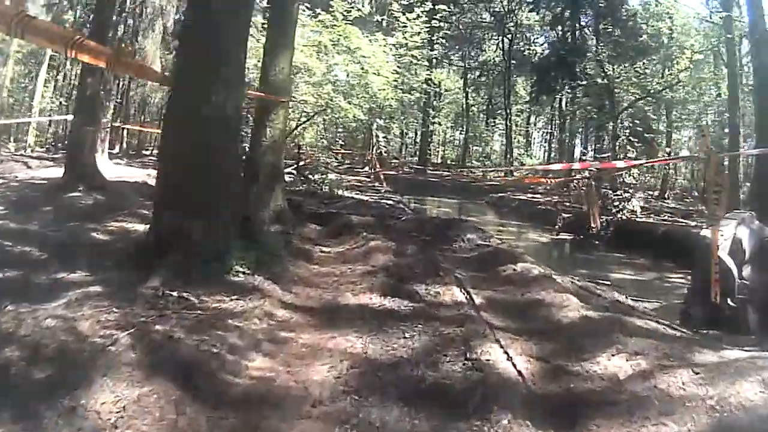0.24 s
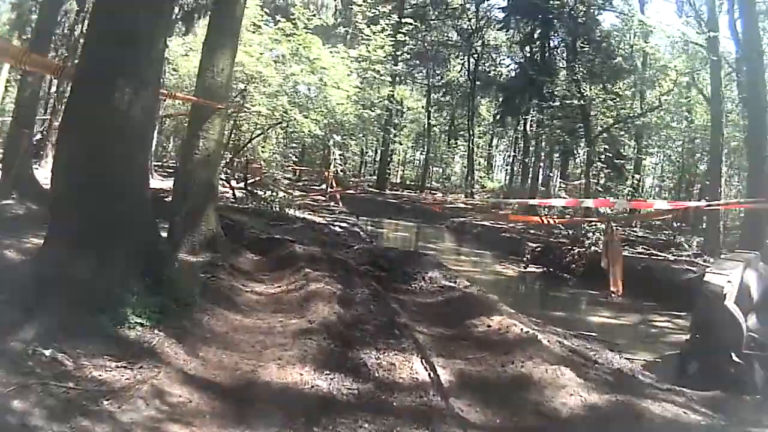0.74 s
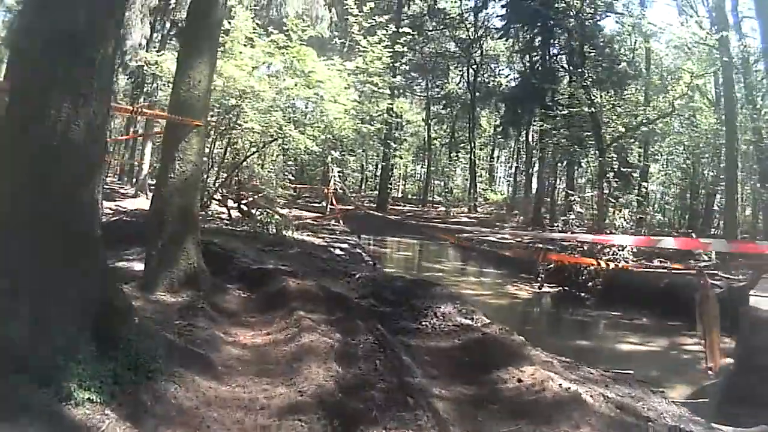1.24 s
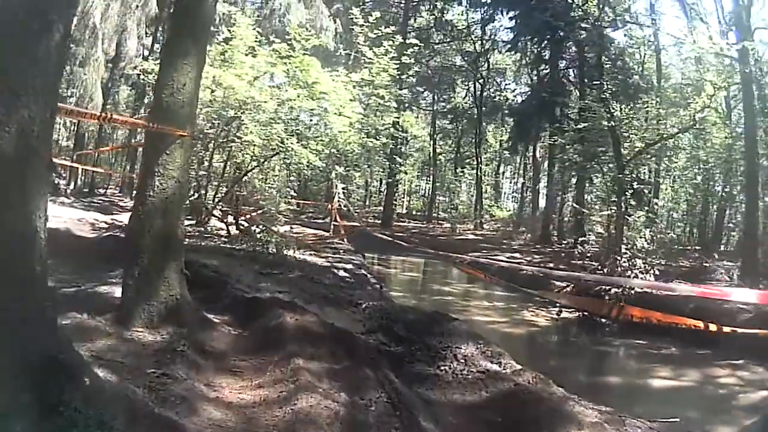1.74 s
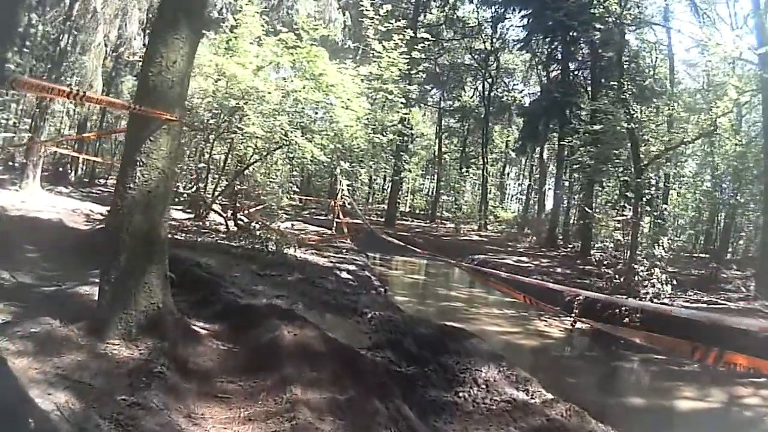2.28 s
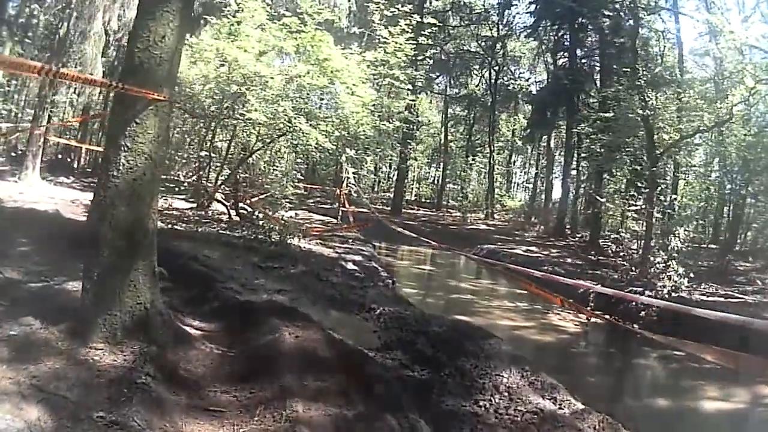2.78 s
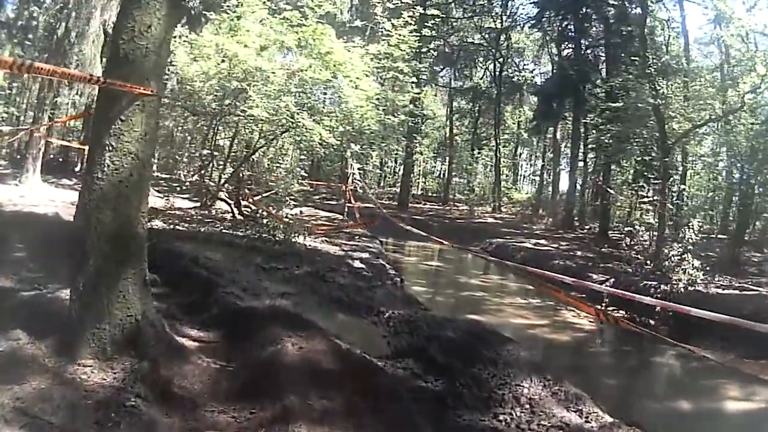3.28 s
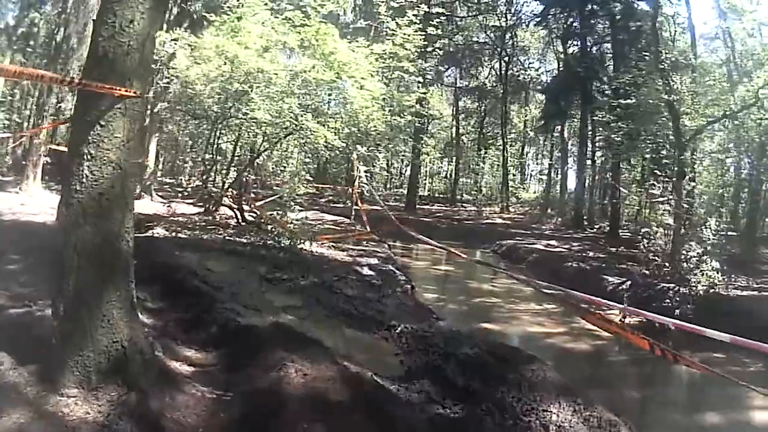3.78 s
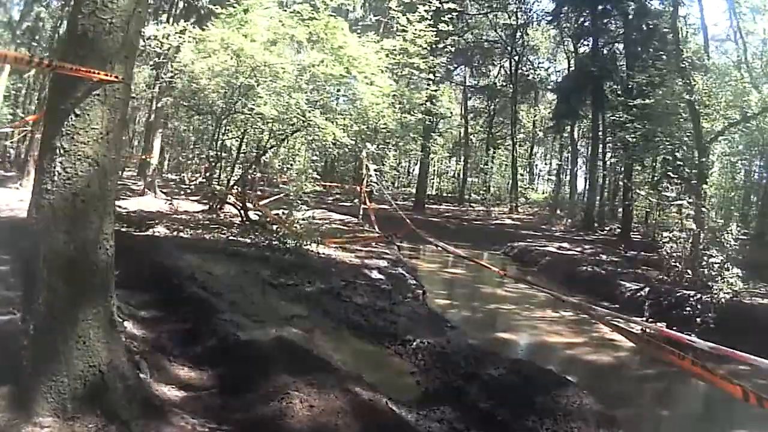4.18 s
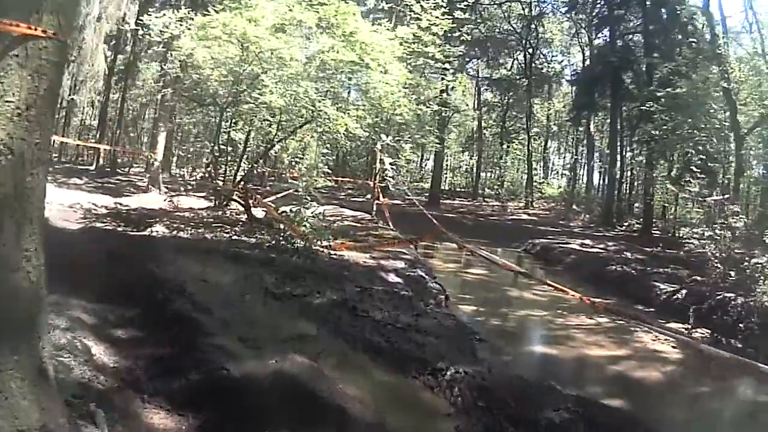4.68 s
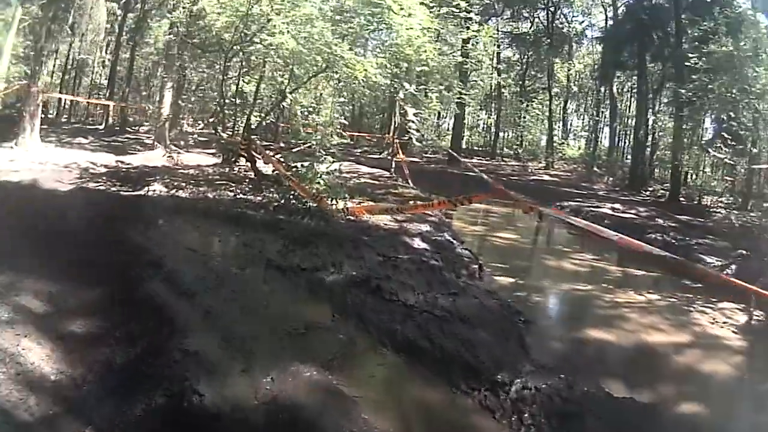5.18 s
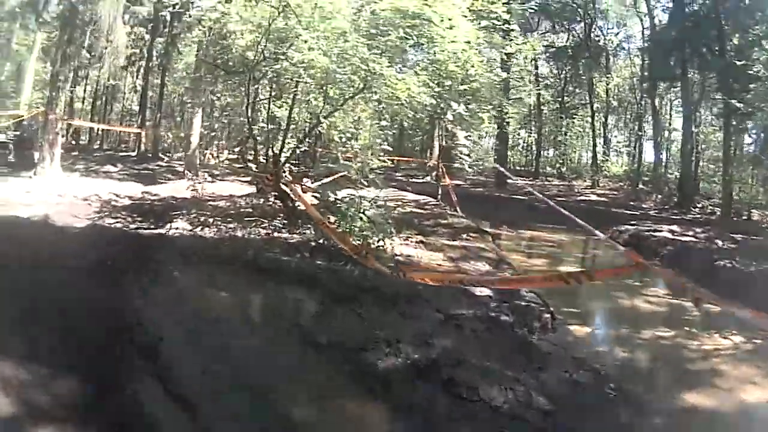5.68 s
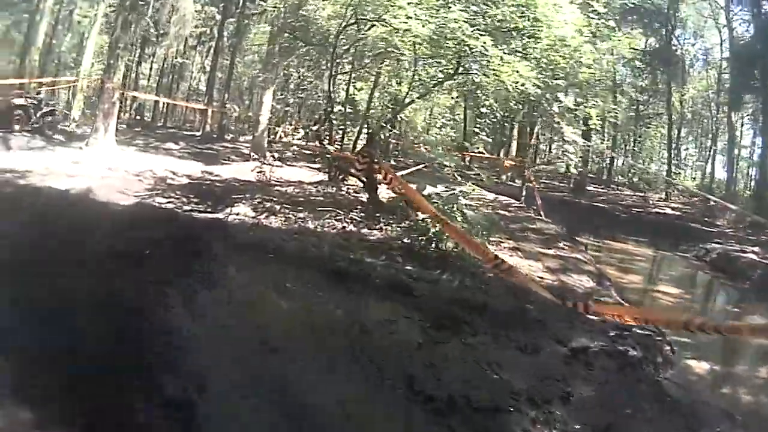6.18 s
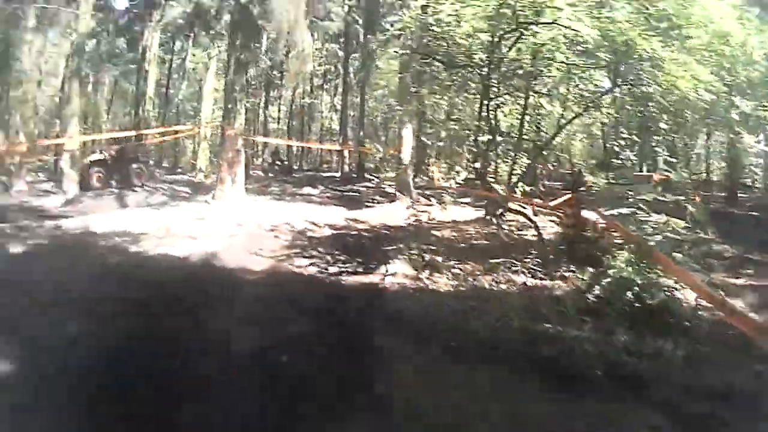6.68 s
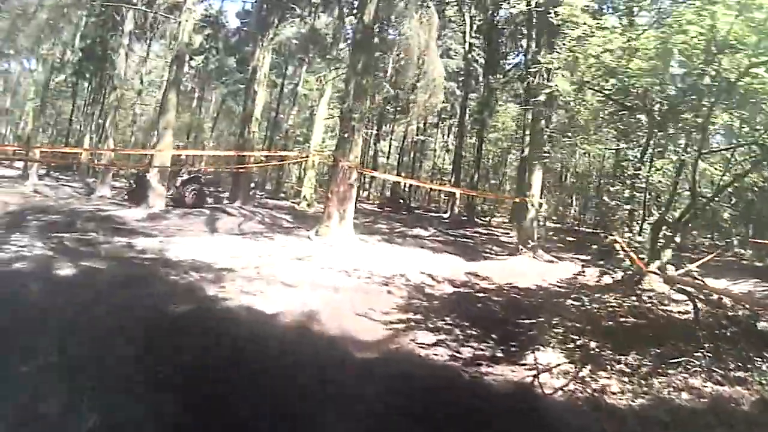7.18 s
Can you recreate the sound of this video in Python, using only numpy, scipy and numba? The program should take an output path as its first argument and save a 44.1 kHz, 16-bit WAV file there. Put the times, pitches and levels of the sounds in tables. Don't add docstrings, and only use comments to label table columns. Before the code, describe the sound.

Boomy twin-cylinder quad chugging slowly along a muddy track, its throttle rising and falling over rattling bodywork, grit ticks and steady hiss.

```python
import sys
import numpy as np
from scipy import signal
from scipy.fft import rfft, irfft
from scipy.io import wavfile
from scipy.ndimage import uniform_filter1d
from numba import njit

SR = 44100
rng = np.random.default_rng(int(sys.argv[2]) if len(sys.argv) > 2 else 0)


def master_out(mix):
    frames = np.transpose(np.atleast_2d(mix))
    ceiling = np.clip(frames, -1, 1)
    pcm = np.round(ceiling * 32767).astype(np.int16)
    wavfile.write(sys.argv[1], SR, pcm)


N = 327663

SPREAD_TURNS = [.027, -.123, 0, .87]
SECOND_FIRING = .4


def undb(db):
    return 10 ** (np.asarray(db) / 20)


def level(x, db):
    return x * undb(db) / np.sqrt(np.mean(x ** 2))


def noise():
    return rng.standard_normal(N)


def walk(rate):
    hold = int(SR / rate)
    steps = np.repeat(rng.standard_normal(N // hold + 1), hold)
    return 1.222 * uniform_filter1d(uniform_filter1d(steps, hold), hold)[:N]


def swells(rows):
    t = np.arange(N) / SR
    return sum(db * np.exp(-((t - s) / length) ** 2) for s, length, db in rows)


@njit
def svf(x, hz, width):
    y, band, low = np.empty(len(x)), 0., 0.
    g, k = np.tan(np.pi * hz / SR), width / hz
    for i in range(len(x)):
        v = (band + g * (x[i] - low)) / (1 + g * (g + k))
        band = 2 * v - band
        low = low + 2 * g * v
        y[i] = k * v
    return y


def ring(x, modes, skirt=2.12):
    out = 0
    for k, (hz, width, db) in enumerate(modes):
        narrow = svf(x, 1. * hz, 1. * width)
        out = out + (-1) ** k * undb(db) * svf(narrow, 1. * hz, skirt * width)
    return out


def speed():
    # (time [s], four-stroke cycle it heads for [Hz], lag [s])
    throttle = [(0.0, 15.0, 0.32), (0.51, 18.3, 0.5), (0.85, 24.3, 0.52), (1.11, 21.6, 0.11),
                (1.58, 9.1, 0.49), (1.96, 21.4, 0.37), (2.36, 19.7, 0.34), (3.01, 24.1, 0.31),
                (4.12, 23.1, 0.5), (4.42, 19.1, 0.3), (4.9, 21.5, 0.72), (5.71, 14.2, 0.2),
                (6.01, 31.1, 0.2), (6.26, 21.5, 0.15), (6.57, 24.8, 0.3), (6.89, 27.9, 0.24),
                (7.14, 23.7, 0.2), (7.25, 8.9, 0.29)]
    start_hz, flywheel_s = 15.35, .04
    t, hz = np.arange(N) / SR, np.full(N, start_hz)
    for s, goal_hz, lag_s in throttle:
        i = int(s * SR)
        hz[i:] = goal_hz + (hz[i] - goal_hz) * np.exp(-(t[i:] - s) / lag_s)
    return uniform_filter1d(hz, int(flywheel_s * SR))


def order_levels(hz, effort_db, jolt_db, bite):
    # (cycle rate [Hz], crank order [dB], third order [dB], fourth order [dB])
    by_speed = [(14.7, -41.5, -46, -60), (16, -40, -45, -48.5), (17.6, -38, -46, -39.5),
                (18.55, -33.5, -42.5, -32), (20.37, -35, -36.5, -31.5), (21.7, -36.5, -36.5, -28),
                (23.33, -37, -35, -29), (24.05, -37, -36, -23), (25, -38, -32.5, -32.5),
                (26.2, -34, -36.5, -39.5)]
    effort_share = [0.63, 1.0, 0.11]
    # (time [s], length [s], change [dB])
    stumbles = [
        (.4, 0.28, 6),
        (.92, 0.092, -14),
        (2.09, 0.038, -6.5),
        (6.05, 0.036, -6),
        (6.47, 0.036, -6),
        (6.65, 0.063, -4.5),
        (6.81, 0.033, -18),
        (6.89, 0.045, -6),
        (7.03, .04, -2),
        (7.39, 0.036, -13),
    ]
    at_hz, *laws = np.transpose(by_speed)
    order_db = [np.interp(hz, at_hz, law) + share * effort_db for law, share in zip(laws, effort_share)]
    order_db[-1] = order_db[-1] + swells(stumbles)
    waver_db = 6 * (1 - bite) + 0.26 * jolt_db
    order_db[1:] = [db + waver_db * walk(20) for db in order_db[1:]]
    return order_db


def layer_levels(effort_db, jolt_db, bite):
    # (idle [dB], driving [dB], share of effort [dB/dB], share of jolts [dB/dB])
    layers = [
        (-48, -40.5, .4, 0.2),
        (-59.5, -52.5, 0.13, 1),
        (-48.5, -45, 0.09, 0.23),
        (-59, -56.5, 0.081, 0.76),
        (-65.5, -64.5, 0.22, 0.71),
    ]
    flicker_db = [1.7, 2.5, 0.66, 1.7, 0.87]
    # (time [s], length [s], change [dB])
    barks = [
        (.35, 0.17, -2),
        (.72, 0.053, 2.5),
        (1.1, .08, 1),
        (1.33, 0.11, -4),
        (1.88, 0.082, 3),
        (3.05, 0.12, 4),
        (3.33, 0.11, -4),
        (5.95, 0.053, 4.5),
        (6.15, .1, -2),
        (7.18, 0.047, 4),
    ]
    layer_db = []
    for (idle, drive, pull, shake), flicker in zip(layers, flicker_db):
        moves_db = pull * effort_db + shake * jolt_db + flicker * walk(8)
        layer_db.append(idle + (drive - idle) * bite + moves_db)
    layer_db[0] = layer_db[0] + swells(barks)
    return layer_db


def order_tone(turns, order, spread_turns):
    return np.sqrt(2) * np.cos(2 * np.pi * (order * turns + np.polyval(spread_turns, order)))


def boom(turns, order_db):
    all_db = [order_db[1] - 20, *order_db]
    return sum(undb(db) * order_tone(turns, k, SPREAD_TURNS) for k, db in enumerate(all_db, start=1))


def stack(turns, hz, first, last, spectrum, spread_turns, sway_db):
    at_hz, gain_db = np.transpose(spectrum)
    out = 0
    for k in range(first, last):
        order_db = np.interp(np.log(k * hz), np.log(at_hz), gain_db) + sway_db * walk(5)
        out = out + undb(order_db) * order_tone(turns, k, spread_turns)
    return out


def firings(turns, scatter_db, late_s):
    out = np.zeros(N)
    for place, db in ((0, 0), (SECOND_FIRING, -5)):
        at = np.flatnonzero(np.diff(np.floor(turns - place)))
        chance = rng.standard_normal((400, 2))[:len(at)]
        late = (late_s * SR * chance[:, 0]).astype(int)
        out[np.clip(at + late, 0, N - 1)] = undb(db + scatter_db * chance[:, 1])
    return out


def gas_puffs(turns):
    first = np.exp(-(turns % 1) / .25)
    second = .6 * np.exp(-((turns - SECOND_FIRING) % 1) / .25)
    return .7 + first + second


def exhaust_pipe(turns, hz):
    # (frequency [Hz], gain [dB])
    pipe = [(70, -5), (92, 5.5), (99, 1.5), (106, -14), (118, 0), (127, -2), (138, -8), (150, -10.5),
            (158, -7), (172, -23), (200, -24.5)]
    note = stack(turns, hz, 5, 12, pipe, SPREAD_TURNS, 1.2)
    roar = level(ring(noise(), [(60, 70, -4), (110, 50, 0), (170, 60, -3)]), -6)
    return note + roar


def air_box(turns, puff):
    drive = level(firings(turns, .8, .0001), 0) + level(puff * noise(), -3)
    return level(ring(drive, [(223.8, 17.3, 5.5), (200.4, 24, -5.5)]), -0.62)


def bodywork(turns, hz, puff):
    # (frequency [Hz], gain [dB])
    body = [(200, -15.5), (240, -16), (262, -9.5), (285, -3.5), (303, -11.5), (323, -1.5), (343, -8.5),
            (362, -22.5), (400, -33)]
    panels = stack(turns, hz, 10, 24, body, [.07, .3, 0], 2.5)
    rattle = level(ring(puff * noise(), [(270, 50, -6), (324, 16, 0)]), -7)
    return undb(-4) * panels + rattle


def chassis(turns, puff):
    # (frequency [Hz], width [Hz], gain [dB])
    modes = [(407, 78, -2.5), (461.7, 12.1, 1), (510, 73, -3), (622.4, 16.6, -2), (657, 43, -9),
             (768, 55, -20.5), (862, 18, -13.5), (1038, 38, -20.5)]
    knocks = level(ring(firings(turns, 1.5, .0002), modes), -5)
    rumble = level(ring(puff * noise(), modes), -2)
    return knocks + rumble


def engine(hz, order_db, pipe_db, box_db, body_db, chassis_db):
    turns = np.cumsum(hz * (1 + .003 * walk(12))) / SR
    puff = gas_puffs(turns)
    out = boom(turns, order_db)
    out += undb(pipe_db) * exhaust_pipe(turns, hz)
    out += undb(box_db) * air_box(turns, puff)
    out += undb(body_db) * bodywork(turns, hz, puff)
    out += undb(chassis_db) * chassis(turns, puff)
    return out


def belt():
    # (time [s], length [s], peak [dB], pitch [Hz], glide [Hz/s])
    sings = [
        (6.55, .1, -53, 451, -20),
        (6.78, .04, -53, 463, 0),
        (7.071, .06, -47, 463, -20),
        (7.24, .05, -47, 475, 150),
    ]
    t, out = np.arange(N) / SR, np.zeros(N)
    for s, length, db, hz, glide in sings:
        since = t - s
        whistle = np.sin(2 * np.pi * (hz * since + glide * since ** 2 / 2))
        out += undb(db) * np.exp(-(since / length) ** 2) * whistle
    return undb(1.5 * walk(25)) * out


def buzz(buzz_db):
    # (frequency [Hz], width [Hz], gain [dB])
    shell = [(1132, 156, -5), (1392, 95, -6), (1882, 30, -1.5), (2210, 400, -10), (2853, 38, -3.5),
             (3253, 290, -1.5), (3632, 170, 0), (3950, 540, -7.5), (4483, 92, -4)]
    strength = rng.exponential(size=N // 64 + 1).repeat(64)[:N]
    grains = noise() * undb(2.14 * uniform_filter1d(strength, size=32))
    return undb(buzz_db + 0.44 * walk(12)) * level(ring(grains, shell, skirt=2.3), 0)


def ticks():
    # (time [s], peak [dB], pitch [Hz], low knock [dB])
    shell_ticks = [(0.8839, -48, 3320, -19), (1.015, -42, 3610, -19), (1.1422, -35.5, 3720, 2.5),
                   (1.7342, -47, 3620, -16), (3.1103, -55, 3050, -17), (5.43, -48, 3656, -12),
                   (5.631, -31, 3620, -9), (5.837, -45, 3640, -19), (5.883, -43.5, 3500, -17),
                   (6.088, -38, 3660, -4), (6.1307, -37, 3650, -1.5), (6.327, -38, 3660, -2),
                   (6.3684, -43, 3330, 0), (6.4986, -40, 3625, -20), (6.8058, -43, 3495, 2),
                   (6.8843, -45.5, 3490, -14.5), (6.9686, -41, 3400, -21), (6.989, -39, 3650, -21)]
    out, t = np.zeros(N + 1024), np.arange(1024) / SR
    for s, db, hz, knock_db in shell_ticks:
        tick = np.sin(2 * np.pi * hz * t) * np.exp(-t / .0016) * (1 - np.exp(-t / .00015))
        tick += undb(knock_db + 0.5) * np.sin(2 * np.pi * 2320 * t) * np.exp(-t / 0.00066)
        crack = svf(rng.standard_normal(1024), 7000., 6000.)
        tick += undb(-9) * crack * np.exp(-t / .0008)
        out[int(s * SR):][:1024] += undb(db) * tick
    return out[:N]


def mud_knocks():
    # (time [s], peak [dB], pitch [Hz])
    knocks = [
        (1.793, -39, 590),
        (5.449, -42, 620),
        (5.529, -46, 649),
        (5.579, -39, 650),
        (6.044, -44, 616),
        (6.639, -49, 636),
    ]
    out, t = np.zeros(N + 1024), np.arange(1024) / SR
    for s, db, hz in knocks:
        out[int(s * SR):][:1024] += undb(db) * np.sin(2 * np.pi * hz * t) * np.exp(-t / 0.003)
    return out[:N]


def wood():
    t = np.arange(N) / SR
    since = t - 5.585
    note = np.exp(-(since / 0.018) ** 2) * np.sin(2 * np.pi * (6050 * since - 6000 * since ** 2))
    brush = np.exp(-((t - 7.415) / 0.023) ** 2) * level(svf(noise(), 7100.0, 6000.), -63)
    return undb(-68) * note + brush


def circuit():
    # (frequency [Hz], density [dB per Hz])
    hiss_curve = [(410, -13), (700, -0.5), (1260, -6), (1530, -4.5), (2140, -7.5), (2600, -7.5),
                  (3290, -10.5), (3990, -6), (4320, -10.5), (12400, -14.5), (15600, -16.5)]
    # (start [s], end [s])
    writes = [
        (.24, .7),
        (1.22, 1.5),
        (2.27, 2.66),
        (3.25, 3.55),
        (4.28, 4.55),
        (5.22, 5.62),
        (6.3, 6.56),
        (7.2, 7.43),
    ]
    at_hz, db = np.transpose(hiss_curve)
    f = np.fft.rfftfreq(N, 1 / SR)
    shape = undb(np.interp(np.log(f + 1), np.log(at_hz), db)) * (f > 300)
    hiss = level(irfft(rfft(noise()) * shape, N), -60.5)
    t = np.arange(N) / SR
    busy = uniform_filter1d(sum(1. * ((t > start) & (t < end)) for start, end in writes), size=900)
    digital_hash = level(ring(noise(), [(12100, 350, 0), (12600, 350, 0), (10600, 500, -6)]), -76)
    whine = level(ring(noise(), [(11850, 150, 0)]), -85)
    return hiss + busy * digital_hash + whine


def scene():
    # (time [s], effort [dB])
    effort = [(0, 1), (.3, -7), (.7, -1), (1.55, 1.5), (1.68, -7), (2.05, 0.5), (5.66, 1), (5.8, -5),
              (5.98, -5.5), (6.08, 9), (6.25, 5.5), (6.38, -2), (6.5, 1.5), (6.68, 6), (6.85, 3.5),
              (6.97, 7), (7.16, 4), (7.27, 0)]
    # (time [s], length [s], shake [dB])
    jolts = [(.42, 0.088, -3.5), (.79, 0.12, 3), (1.5, 0.17, 4.5), (1.76, 0.075, 4), (2.13, 0.1, 5.5),
             (2.6, .25, -1.5), (3.3, .1, 2), (3.65, .25, 2.5), (4.6, 0.39, 1.5), (5.3, 0.18, 2),
             (5.46, 0.046, 4), (5.64, 0.082, 4), (5.87, 0.059, 6), (6.11, 0.11, 5.5), (6.65, 0.37, 5.5),
             (7.03, 0.13, 6.5), (7.19, 0.087, 6), (7.35, 0.078, 4.5)]
    hz, jolt_db = speed(), swells(jolts)
    effort_db = np.interp(np.arange(N) / SR, *np.transpose(effort))
    bite = .5 + .5 * np.tanh((hz - 17.67) / 0.66)
    order_db = order_levels(hz, effort_db, jolt_db, bite)
    *engine_db, buzz_db = layer_levels(effort_db, jolt_db, bite)
    hz = hz * (1 + 0.001503 * jolt_db * walk(15))
    machine = engine(hz, order_db, *engine_db) + belt()
    housing = buzz(buzz_db) + ticks() + mud_knocks()
    return (machine + housing + wood() + circuit())[None]


def band_limit(x):
    return signal.sosfilt(signal.butter(12, 15770, fs=SR, output="sos"), x)


def record(dry):
    top_cut = signal.ellip(8, .2, 70, 15750, fs=SR, output="sos")
    mix = signal.sosfilt(top_cut, dry) - .0015
    return band_limit(mix)


dry = scene()
out = record(dry)
master_out(out)
```